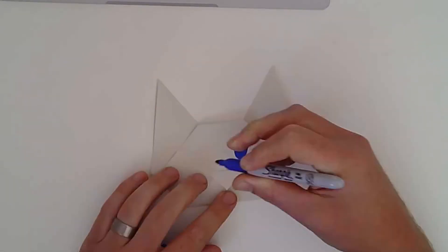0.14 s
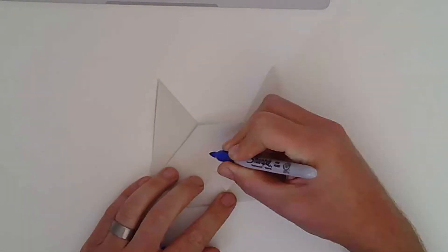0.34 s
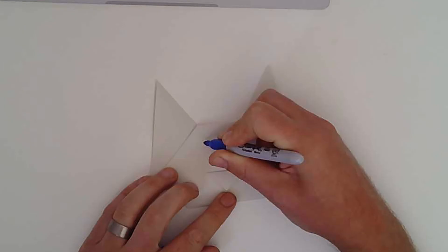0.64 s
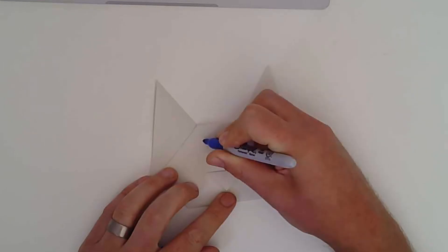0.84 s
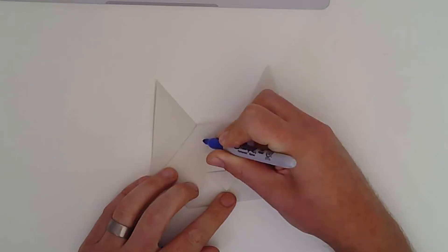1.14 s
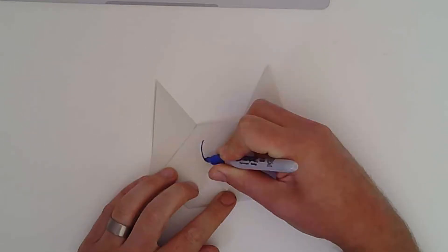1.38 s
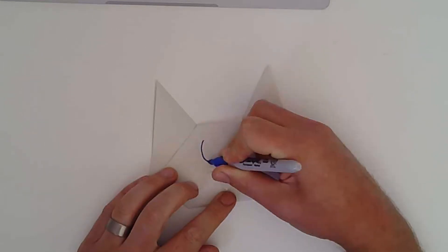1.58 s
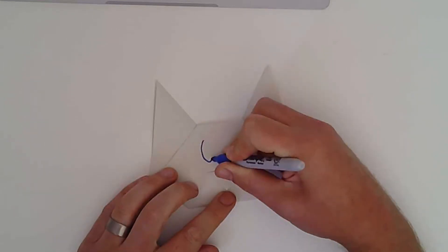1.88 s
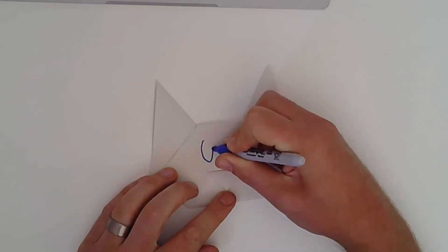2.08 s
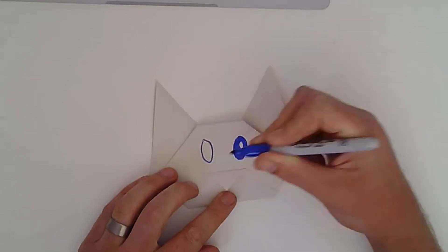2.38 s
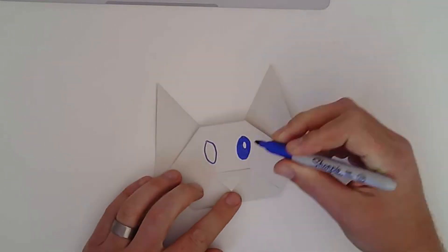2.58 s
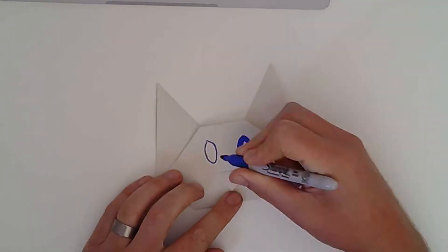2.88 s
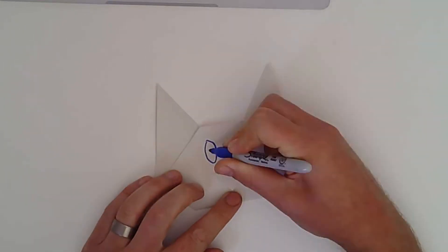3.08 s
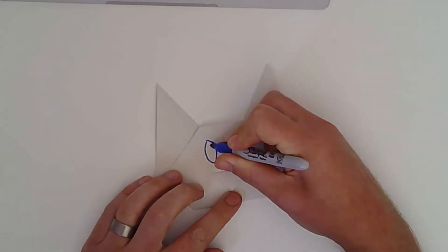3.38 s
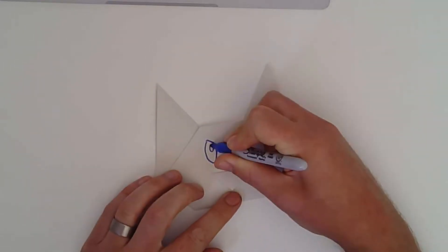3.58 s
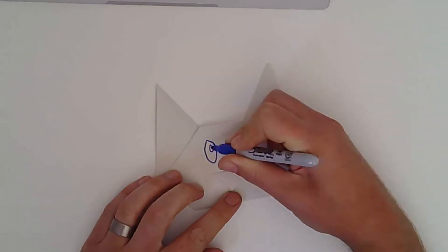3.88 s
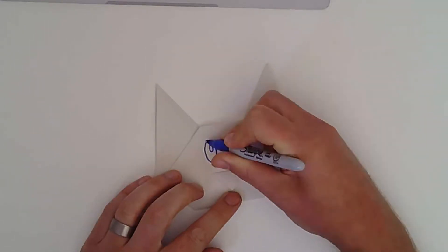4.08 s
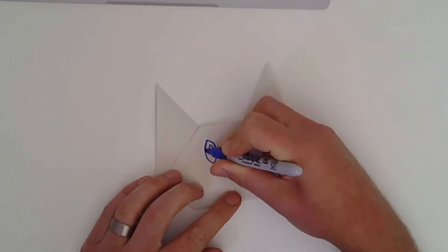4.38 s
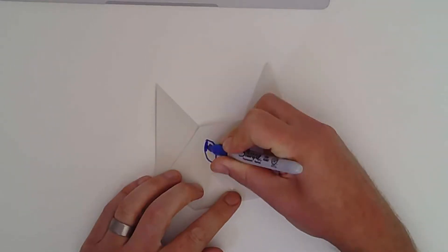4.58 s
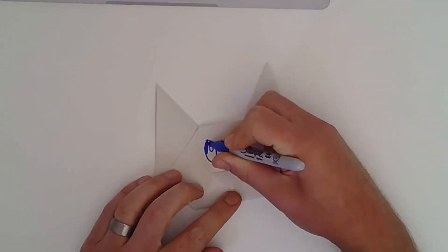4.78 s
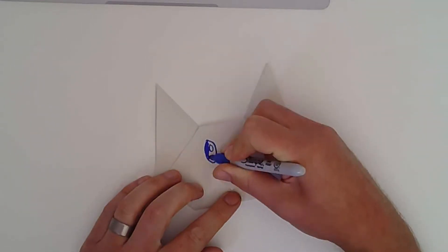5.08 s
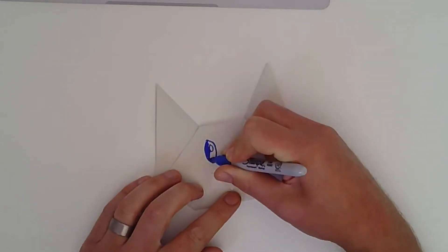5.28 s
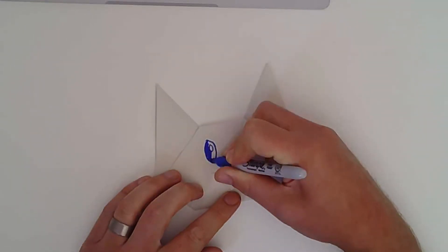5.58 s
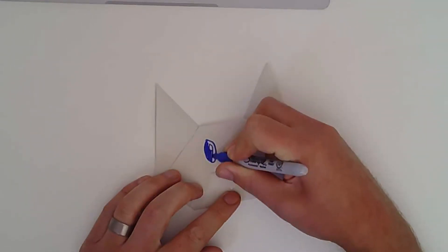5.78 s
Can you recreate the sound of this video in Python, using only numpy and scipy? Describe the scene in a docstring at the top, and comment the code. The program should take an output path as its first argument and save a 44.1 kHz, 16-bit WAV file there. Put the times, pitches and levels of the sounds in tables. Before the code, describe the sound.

Faint, close scratching of a marker on paper, with a few light ticks, turning into rhythmic scribbling in a quietly humming room.

```python
"""A felt-tip marker, heard close up, draws a small oval on paper lying on a table, then fills it in
with quick back-and-forth strokes. The sliding nib plucks paper fibres, which ring the sheet and the pen.
Now and then the pen ticks, the nib squeaks or the hand thuds on the table. The marker reaches one
microphone with short echoes off the hand and table; behind it lie the mains hum and low rumble
of a quiet room."""
import sys
import numpy as np
from scipy import signal
from scipy.fft import rfft, irfft
from scipy.io import wavfile
from scipy.ndimage import map_coordinates

SR = 44100
rng = np.random.default_rng(int(sys.argv[2]) if len(sys.argv) > 2 else 0)


def waveform_to_disk(signal):
    """Save audio, clipped to [-1, 1], as 16-bit WAV at the path in sys.argv[1]."""
    frames = np.transpose(np.atleast_2d(signal))
    scaled = np.clip(frames, -1, 1) * 32767
    samples = np.round(scaled).astype(np.int16)
    wavfile.write(sys.argv[1], SR, samples)


N = 261853
TIME = np.arange(N) / SR

# the oval, one slow line down one side and up the other: (time [s], hiss level [dB], relative rasp [dB])
OVAL_DOWNSTROKE = [(0.745, -80, -3), (0.812, -62.5, -3), (0.885, -63, -7.5), (1.04, -64.5, -5.5),
                   (1.11, -70, 0.5), (1.246, -71.5, 0.5), (1.286, -82, 0), (1.33, -74, 2.5), (1.4, -83, 5),
                   (1.44, -74.5, 8)]
OVAL_UPSTROKE = [(1.5, -76.5, 8), (1.545, -64.5, 3), (1.585, -67.5, 2.5), (1.668, -60.5, -3),
                 (1.695, -65.5, 0), (1.73, -62, -2), (1.835, -60.5, -4.5), (1.92, -52, -4),
                 (1.992, -54.5, -4), (2.004, -70, -1), (2.03, -73, 0)]
# short separate marks: (start [s], fastest [s], end [s], hiss level [dB], relative rasp [dB])
SHORT_MARKS = [(0.01, 0.068, 0.2, -68, -2), (2.024, 2.098, 2.16, -69, -0.5), (2.13, 2.25, 2.39, -72, -1.5),
               (3.1, 3.227, 3.41, -61.5, -8.5), (3.307, 3.38, 3.422, -56.5, -9),
               (3.40, 3.425, 3.43, -71, 3), (3.807, 3.846, 3.7, -69, -5)]
# filling strokes, light and firm in turn:
# (start [s], fastest [s], end [s], level [dB], relative rasp [dB], share on the side of the nib [0-1])
FILL_STROKES = [(3.88, 3.995, 4.07, -60.5, -2, .6), (4.078, 4.133, 4.192, -61, -.5, .8),
                (4.2, 4.278, 4.34, -53.7, -1, .1), (4.355, 4.412, 4.468, -60.3, 1.3, .8),
                (4.469, 4.538, 4.597, -51.7, -2, .1), (4.598, 4.675, 4.728, -61.3, 1.8, .8),
                (4.715, 4.785, 4.862, -52.2, -3, .1), (4.858, 4.928, 4.978, -61.2, -1, .8),
                (4.972, 5.034, 5.1, -52, -.5, .1), (5.115, 5.178, 5.218, -60.7, -.3, .7),
                (5.221, 5.275, 5.33, -58.7, -2.5, .3), (5.29, 5.325, 5.38, -53.5, .3, .1),
                (5.382, 5.433, 5.507, -59.4, -1, .6), (5.512, 5.574, 5.636, -50.8, 1, .1),
                (5.646, 5.712, 5.772, -58.8, .5, .8), (5.779, 5.85, 5.898, -52.9, 0, .1),
                (5.895, 5.97, 6.04, -55, -.5, .8)]
# colour of the rubbing when drawing and when filling: (frequency [Hz], gain [dB])
DRAW_SPECTRUM = [(500, -10), (1500, -10.5), (2050, -12), (2700, -10.5), (4200, -6), (5600, -1.2),
                 (6450, -2.5), (7100, -5.5), (7700, -3.7), (8700, 0), (9250, -2), (10100, -0.5),
                 (10700, -8.5), (11900, -3), (13100, -13), (15500, -11.5)]
FILL_SPECTRUM = [(500, -21.5), (1500, -14.5), (2100, -14), (3000, -12), (4200, -7.5), (5200, -6.5),
                 (6000, -3.5), (7100, -5), (8200, -3), (9200, 1.5), (10100, -1.5), (10600, -4),
                 (11800, 0.5), (13200, -6), (14100, -11), (15200, -6.5)]
# resonances and notches of pen and sheet: (frequency [Hz], width [Hz], lift [dB])
SHEET_RINGS = [(1464, 100, 8), (2600, 100, 3), (2870, 120, 7.5), (3720, 130, 8), (3870, 100, -12),
               (4660, 160, 1.5), (4920, 80, 4.5), (5370, 80, 3), (5706, 70, 5.5), (6560, 100, 6),
               (6950, 300, -3), (7642, 60, 5.5), (8690, 60, 2), (9700, 50, 2.5), (10143, 50, 3.5),
               (10730, 210, -3), (10950, 130, 4), (11720, 90, 3.5), (11920, 90, 2.5), (13100, 140, -6)]  # narrow, in every stroke
FIRM_HAND_RINGS = [(2570, 220, 7), (3030, 220, 7.5), (5230, 160, 4), (6400, 400, 2)]  # brought out by a firm hand
LIGHT_HAND_DIP = [(3650, 140, -1.5)]  # barely stirred by a light hand
NIB_SIDE_RINGS = [(4560, 900, 4), (6230, 450, 3), (7850, 1100, 2.5), (15400, 1000, 5.5)]  # broad, from the nib dragged on its side
# pen ticks: (time [s], knock level [dB], scuff level [dB], scuff decay [s])
PEN_TICKS = [(1.066, -59.5, -80, 0.014), (2.031, -72, -61, 0.0057), (2.098, -73, -64, .002),
             (2.11, -62.5, -60, .002), (2.4586, -83, -59, .002), (2.462, -53.3, -50.5, 0.0028),
             (2.467, -61, -64, .003), (2.525, -90, -69, 0.022), (2.685, -80, -71, .03),
             (3.3913, -55.5, -52, 0.0082), (3.398, -66, -64, .003), (3.466, -78, -61, .006)]
# modes of the pen against the table: (frequency [Hz], relative level [dB], t60 [s])
PEN_MODES = [(425, -1.5, 0.069), (570, -6, 0.032), (741, 0, 0.035), (910, 2, 0.03), (950, -5, 0.026),
             (1091, -1, 0.034), (1320, 4.5, 0.043), (1680, -0.5, 0.057), (1810, -5, 0.03),
             (2020, -12, 0.015), (2560, 5.5, 0.022)]
# colour of the table top's dry crack and of the nib's scuff: (frequency [Hz], gain [dB])
CRACK_SPECTRUM = [(300, -3.5), (650, -5), (950, -0.5), (1600, -4), (2600, -10.5), (3100, -13), (8000, -26)]
SCUFF_SPECTRUM = [(1000, -24), (3500, -2.5), (5000, -3), (6000, -5), (7300, 1), (8400, 4.5), (10500, -6),
                  (15500, -12)]
# squeaks of the stopping nib: (time [s], half length [s], pitch [Hz], level [dB])
NIB_SQUEAKS = [(2.105, .0045, 6480, -62), (3.468, .002, 6000, -64)]
# the hand shifting on the table: (time [s], level [dB], half length [s], pitch [Hz])
HAND_THUDS = [(2.114, -62, 0.021, 154), (5.6, -65, 0.014, 212), (5.645, -56.5, 0.016, 116),
              (5.69, -67, .02, 180), (5.656, -68.5, .02, 260), (5.785, -62.5, 0.012, 174),
              (5.859, -65.5, 0.019, 228)]
# mains hum: (harmonic [number], rms level [dB])
HUM_HARMONICS = [(1, -49), (2, -67), (4, -80), (5, -82.5), (7, -96)]
# colour of the room tone: (frequency [Hz], gain [dB])
ROOM_SPECTRUM = [(8, -7), (18, -.5), (35, -4), (70, -8), (120, -13.5), (180, -17), (250, -18.5), (400, -23),
                 (700, -27.5), (1500, -32.5), (3000, -35), (7000, -38), (12000, -39.5), (15500, -41)]


def drawing(oval_trim_db=-0.3, rasp_trim_db=-0.9, speed_power=1.7, light_db=-62, firm_db=-53):
    """Oval and marks: hiss follows nib speed, rasp also direction; a firm hand rings the sheet more."""
    fibres = friction(snaps_per_s=8000, spread_db=2.8, catch_db=1.4, catch_hz=600, drag_db=.5, drag_hz=80)
    times, hiss_db, rasp_db = np.vstack([OVAL_DOWNSTROKE, OVAL_UPSTROKE]).T
    firmness = np.clip((np.interp(TIME, times, hiss_db) - light_db) / (firm_db - light_db), 0, 1)
    skimming = sheet(fibres, DRAW_SPECTRUM, SHEET_RINGS + LIGHT_HAND_DIP, depth=0.92)
    digging = sheet(fibres[::-1], DRAW_SPECTRUM, SHEET_RINGS + FIRM_HAND_RINGS, depth=0.89)
    rasp, hiss = rasp_and_hiss(np.sqrt(1 - firmness) * skimming + np.sqrt(firmness) * digging)
    rasp, hiss = undb(rasp_trim_db) * unit(rasp), unit(hiss)
    oval_gain = np.interp(TIME, times, undb(hiss_db + oval_trim_db), left=0, right=0)
    out = oval_gain * (hiss + undb(np.interp(TIME, times, rasp_db)) * rasp)
    for start, fastest, end, db, mark_rasp_db in SHORT_MARKS:
        gain = undb(db) * nib_speed(start, fastest, end) ** speed_power
        out += gain * (hiss + undb(mark_rasp_db) * rasp)
    return out


def filling(speed_power=1.37, drag_db=-73, firm_db=-55, brightening=0.052, trim_db=-0.26, rasp_db=-0.5):
    """Back-and-forth strokes, coloured by their direction; the nib still drags faintly at the turns."""
    fibres = friction(snaps_per_s=10000, spread_db=1, catch_db=1, catch_hz=590, drag_db=1, drag_hz=95)
    tip = sheet(fibres, FILL_SPECTRUM, SHEET_RINGS)
    side = sheet(fibres[::-1], FILL_SPECTRUM, SHEET_RINGS + NIB_SIDE_RINGS)
    tip_rasp, tip_hiss = rasp_and_hiss(tip)
    side_rasp, side_hiss = rasp_and_hiss(side)
    touch_down = np.interp(TIME, FILL_STROKES[0][:2], [0, 1])
    out = undb(drag_db) * touch_down * side
    for start, fastest, end, db, stroke_rasp_db, on_side in FILL_STROKES:
        gain = undb(db + trim_db) * nib_speed(start, fastest, end) ** speed_power
        # the rasp grows more slowly than the hiss, so fast strokes are brighter
        rasp_gain = undb(rasp_db + stroke_rasp_db) * (gain / undb(firm_db) + 1e-3) ** -brightening
        from_tip = np.sqrt(1 - on_side) * (tip_hiss + rasp_gain * tip_rasp)
        from_side = np.sqrt(on_side) * (side_hiss + rasp_gain * side_rasp)
        out += gain * (from_tip + from_side)
    return out


def nib_speed(start, fastest, end):
    """A stroke speeds up from rest and slows to rest again; 1 at its fastest."""
    return np.sin(np.pi / 2 * np.interp(TIME, [start, fastest, end], [0, 1, 0]))


def friction(snaps_per_s, spread_db, catch_db, catch_hz, drag_db, drag_hz):
    """Fibres snap free under the nib in a dense stream, bunching as the felt catches and slips."""
    snaps = rng.random(N) < snaps_per_s / SR
    size = rng.choice([-1, 1], N) * undb(spread_db * np.minimum(rng.exponential(size=N), 5))
    return snaps * size * undb(catch_db * wander(catch_hz) + drag_db * wander(drag_hz))


def sheet(fibres, spectrum, rings, depth=0.95, pitch_sway=.003):
    """Fibres ring sheet and pen; as the nib travels, the resonances come and go and slide in pitch."""
    plain, rung = colour(fibres, spectrum), colour(fibres, spectrum, rings)
    ring_depth = np.clip(depth + 0.3 * wander(rate_hz=7), 0, 1.3)
    rubbing = plain + ring_depth * (rung - plain)
    position = np.cumsum(1 + pitch_sway * wander(rate_hz=9))
    return unit(map_coordinates(rubbing, [position], order=5, mode="mirror"))


def rasp_and_hiss(rubbing, split_hz=7100):
    """Part the rubbing into the sheet's lower rasp and the fibres' high hiss."""
    rasp = signal.sosfiltfilt(signal.butter(6, split_hz, fs=SR, output="sos"), rubbing)
    return rasp, rubbing - rasp


def pen_ticks(contact_s=0.001, energy_s=0.0065, modes_db=-4.5, crack_db=1, crack_s=0.0052):
    """A brief push knocks the table with a dry crack and rings the pen, while the nib scuffs the paper."""
    age = TIME[:SR // 5]
    knock = sum(undb(db - 60 * age / t60) * np.sin(2 * np.pi * hz * age + rng.uniform(0, 2 * np.pi))
                for hz, db, t60 in PEN_MODES)
    knock *= 1 - np.exp(-age / contact_s)
    knock *= undb(modes_db) / np.sqrt(np.sum(knock ** 2) / (energy_s * SR))
    pushes, crack_gain, scuff_gain = np.zeros((3, N))
    for at, knock_db, scuff_db, scuff_s in PEN_TICKS:
        pushes[int(at * SR)] += undb(knock_db)
        crack_gain += undb(knock_db + crack_db) * (TIME >= at) * np.exp(-np.abs(TIME - at) / crack_s)
        scuff_gain += undb(scuff_db) * (TIME >= at) * np.exp(-np.abs(TIME - at) / scuff_s)
    knocks = signal.fftconvolve(pushes, knock)[:N]
    return knocks + crack_gain * noise(CRACK_SPECTRUM) + scuff_gain * noise(SCUFF_SPECTRUM)


def nib_squeaks(wobble_rad=1.7):
    """The felt sticks and slips for an instant in a rough, high chirp."""
    roughness = wobble_rad * wander(rate_hz=1200)
    return sum(swell(at, half_s, db) * np.sin(2 * np.pi * hz * TIME + roughness)
               for at, half_s, hz, db in NIB_SQUEAKS)


def hand_thuds(wobble_rad=0.78):
    """Each soft push of the hand sets the table top swinging for a few cycles."""
    drift = wobble_rad * wander(rate_hz=80)
    return sum(swell(at, half_s, db) * np.sin(2 * np.pi * hz * (TIME - at) + drift)
               for at, db, half_s, hz in HAND_THUDS)


def hand_echo(rubbing, share=0.25, lag_s=.0014, sway_s=0.00012):
    """The hand reflects the rubbing to the microphone; as it moves, the ripple in the colour slides."""
    position = np.arange(N) - SR * (lag_s + sway_s * wander(rate_hz=5))
    echo = map_coordinates(rubbing, [position], order=3)
    return (rubbing + share * echo) / np.hypot(1, share)


def table_echoes(direct, wet_db=-6, t60=0.044, count=120):
    """Short echoes off the table and things near it ripple the spectrum at the microphone."""
    lag_s = rng.uniform(.004, .06, count)
    size = rng.standard_normal(count) * undb(-60 * lag_s / t60)
    response = np.zeros(SR // 10)
    response[(lag_s * SR).astype(int)] = undb(wet_db) * size / np.linalg.norm(size)
    return direct + signal.fftconvolve(direct, response)[:N]


def room_tone(mains_hz=50, noise_db=-58.5):
    """The room behind the table: steady mains hum over a low rumble and faint hiss."""
    hum = sum(np.sqrt(2) * undb(db) * np.sin(2 * np.pi * (harmonic * mains_hz * TIME + rng.random()))
              for harmonic, db in HUM_HARMONICS)
    return hum + undb(noise_db) * noise(ROOM_SPECTRUM)


def colour(x, spectrum, rings=()):
    """Causal filter through the points of a spectrum, with resonances on top."""
    hz = np.arange(N + 1) * SR / (2 * N)
    point_hz, point_db = np.transpose(spectrum)
    db = np.interp(np.log(hz + 1), np.log(point_hz), point_db)
    for centre, width, lift in rings:
        db += lift / (1 + (2 * (hz - centre) / width) ** 2)
    cepstrum = irfft(np.log(undb(db)))
    cepstrum[1:N] *= 2  # fold to minimum phase: ringing follows each snap
    cepstrum[N + 1:] = 0
    return irfft(rfft(x, 2 * N) * np.exp(rfft(cepstrum)))[:N]


def noise(spectrum):
    """Coloured noise at rms 1."""
    return unit(colour(rng.standard_normal(N), spectrum))


def swell(at, half_s, db):
    """Bell-shaped envelope that brings a sine to the given rms level at its peak."""
    return np.sqrt(2) * undb(db) * np.exp(-.5 * ((TIME - at) / half_s) ** 2)


def wander(rate_hz, count=8192):
    """Smooth random motion at rms 1."""
    return unit(np.interp(TIME * rate_hz, np.arange(count), rng.standard_normal(count)))


def undb(db):
    """Decibels to gain."""
    return 10 ** (np.asarray(db) / 20)


def unit(x):
    """Scale to rms 1."""
    return x / np.sqrt(np.mean(x ** 2))


def scene():
    """One microphone near the table: the marker and its close echoes in front, the room behind."""
    rubbing = hand_echo(drawing() + filling())
    marker = table_echoes(rubbing + pen_ticks() + nib_squeaks())
    return (marker + hand_thuds() + room_tone())[None]


def record(dry, top_hz=15650):
    """The recorder cuts the top steeply."""
    return signal.sosfilt(signal.ellip(12, .1, 80, top_hz, fs=SR, output="sos"), dry)


dry = scene()
out = record(dry)
waveform_to_disk(out)
```